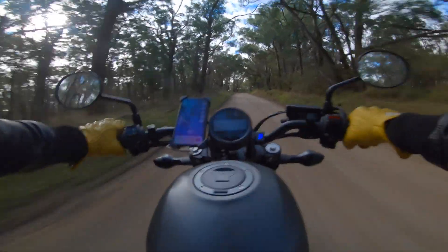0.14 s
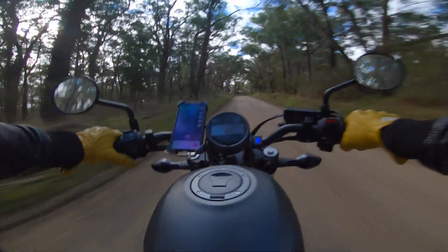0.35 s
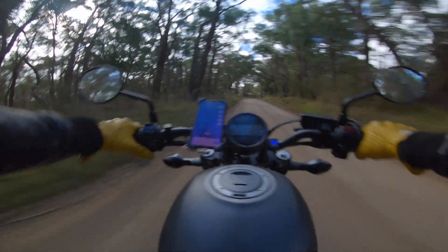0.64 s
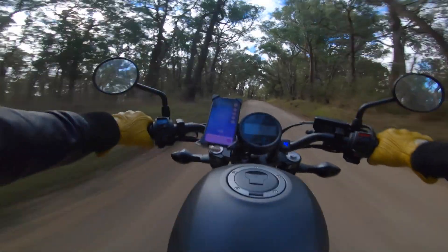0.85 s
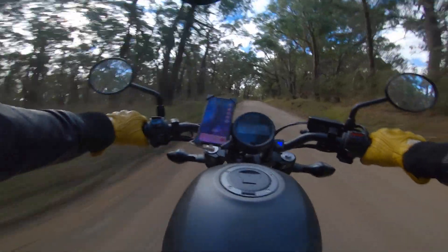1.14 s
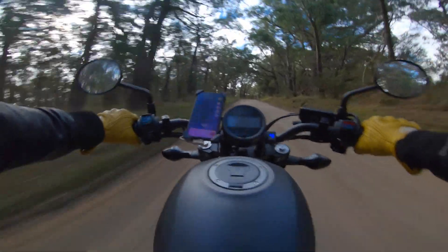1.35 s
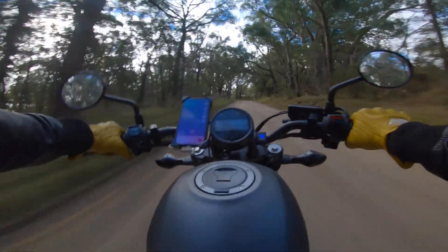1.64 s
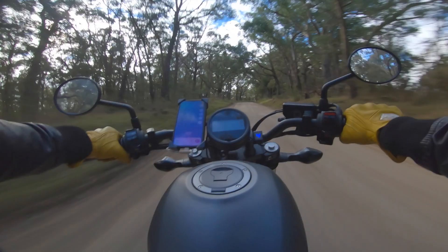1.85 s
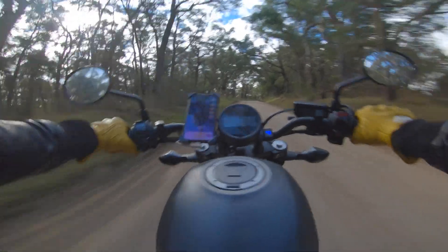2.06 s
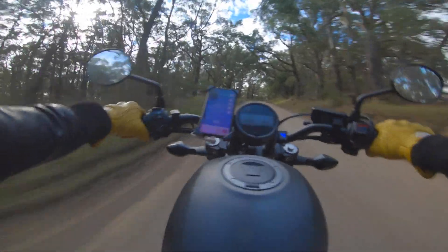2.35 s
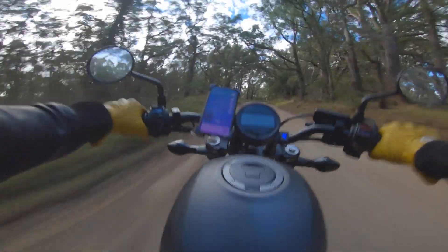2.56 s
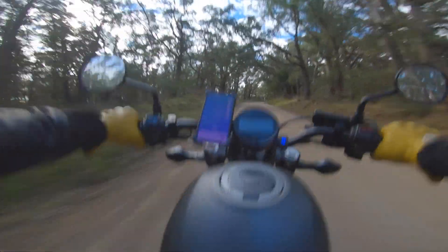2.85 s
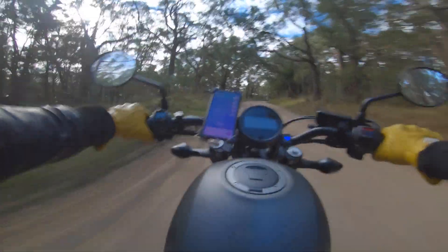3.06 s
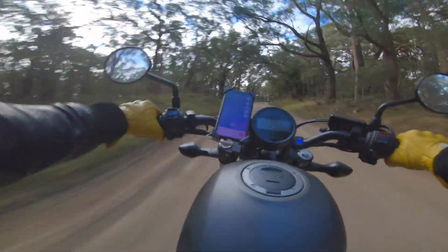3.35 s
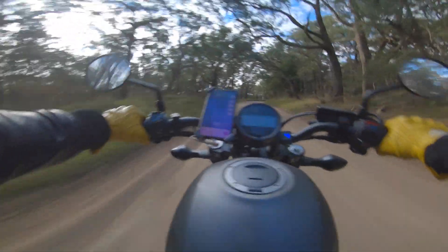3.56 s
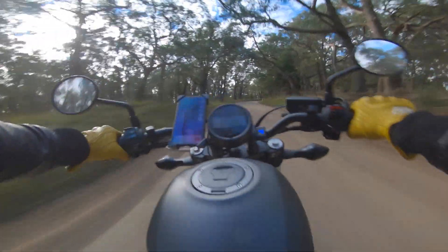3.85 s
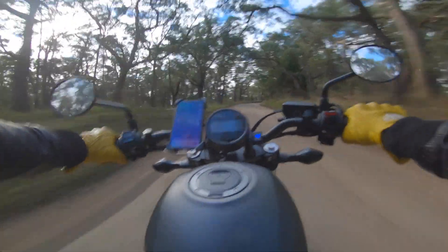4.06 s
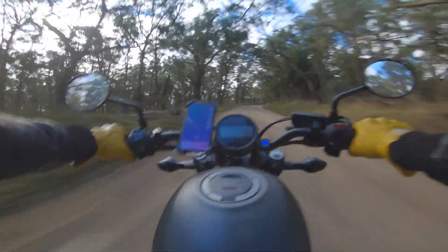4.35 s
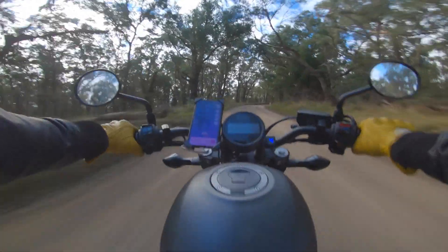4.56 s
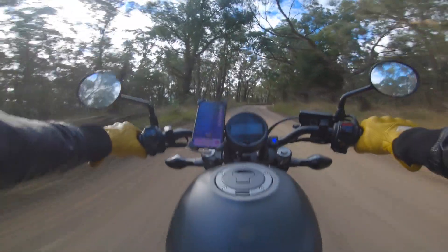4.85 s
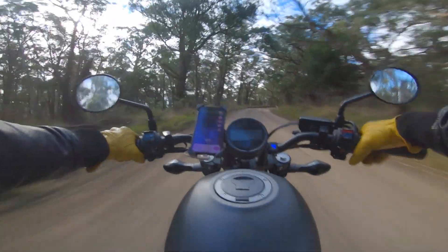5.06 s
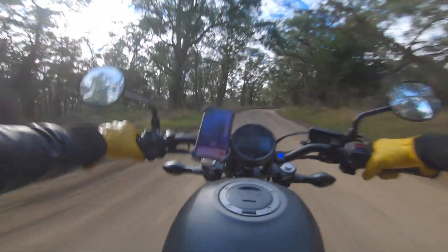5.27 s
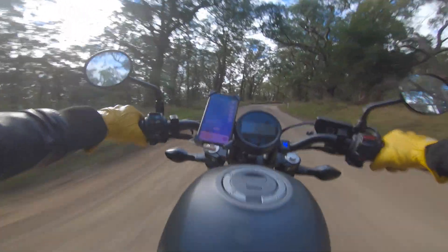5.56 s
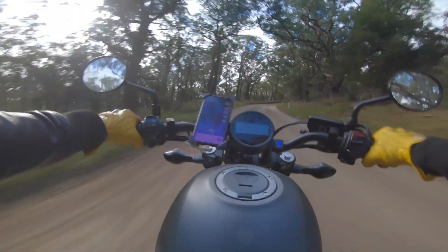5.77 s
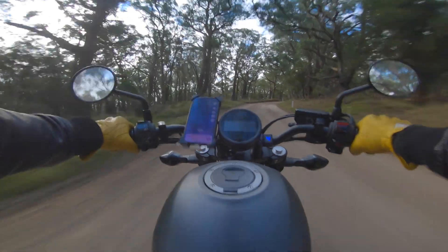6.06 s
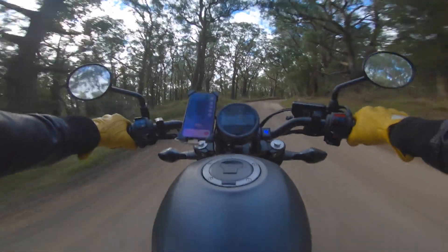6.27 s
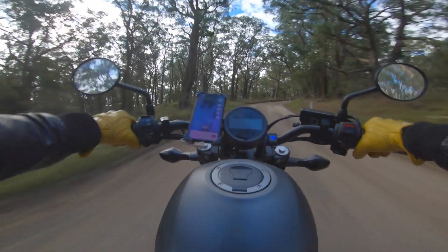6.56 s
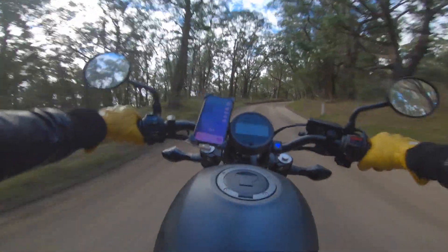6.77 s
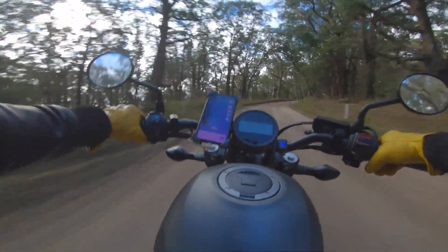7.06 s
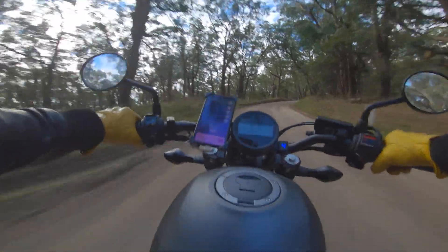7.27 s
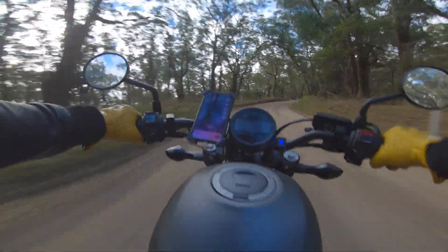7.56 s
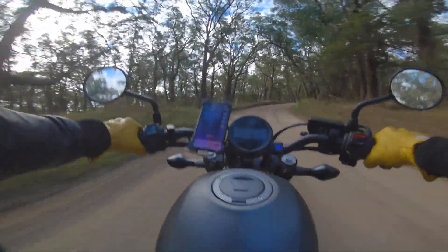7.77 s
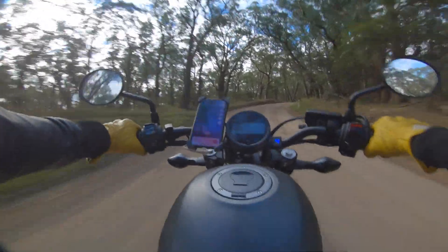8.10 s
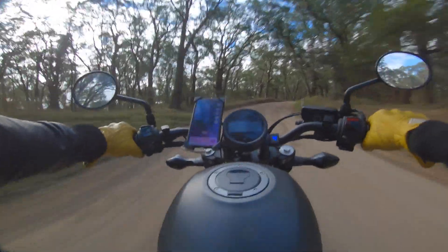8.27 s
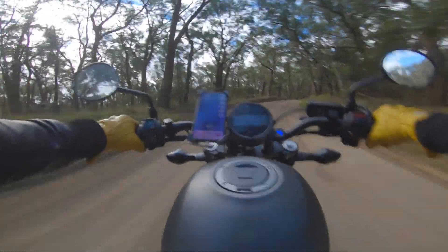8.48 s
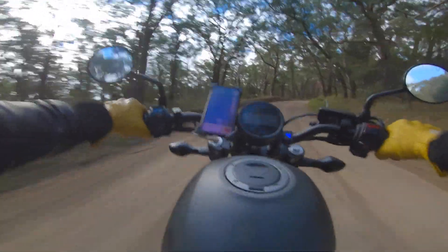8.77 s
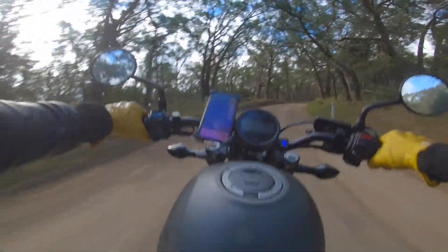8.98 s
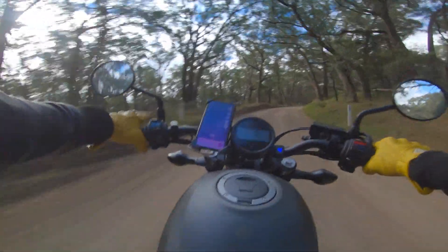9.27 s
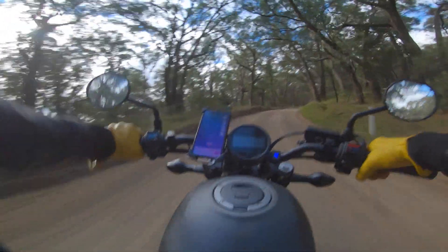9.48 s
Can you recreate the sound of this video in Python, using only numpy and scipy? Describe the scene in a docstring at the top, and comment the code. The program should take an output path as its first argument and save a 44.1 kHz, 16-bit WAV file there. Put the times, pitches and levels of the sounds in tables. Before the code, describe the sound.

Continuous muffled motorcycle drone on an unpaved forest road, with the microphone close against the rider's body. Airy, booming intake pulses rise gradually, soften at several brief throttle roll-offs and end slower and deeper. Mechanical clatter rides on the pulses, and low wind rumbles softly. Tyre grit is very faint. One bright click stands out near the start; heavy low bumps hit just past halfway, followed by a short loose-panel rattle.

```python
"""A twin-cylinder motorcycle throbs along a gravel forest track, muffled as by a microphone on the rider's chest.
Two gulps of air a cycle ring airbox and intake pipe; closing valves add rasp. Roll-offs of the throttle soften them.
Filtered noise makes wind rumble, engine clatter, a buzzing panel and, with stones ringing the bodywork, tyre crunch.
Short pushes through resonances make the knocks; one decaying step makes a sharp click."""
import sys
import numpy as np
from scipy import signal
from scipy.fft import rfft, irfft, next_fast_len
from scipy.io import wavfile
from scipy.ndimage import uniform_filter1d, minimum_filter1d

SR = 44100
rng = np.random.default_rng(int(sys.argv[2]) if len(sys.argv) > 2 else 0)


def store_wav(level_fs):
    """Save 16-bit WAV to argv[1]."""
    pcm = np.round(np.clip(np.atleast_2d(level_fs), -1, 1) * 32767)
    wavfile.write(sys.argv[1], SR, pcm.T.astype(np.int16))


N = 425124
TIME = np.arange(N) / SR
CRUISE_CYCLES_PER_S = 18  # four-stroke cycles
SECOND_LAG_CYCLES = .226  # between the two cylinders' intakes


def from_db(db):
    """Decibels to amplitude gain."""
    return 10 ** (np.asarray(db) / 20)


def rms_one(x):
    """Scale to unit rms."""
    return x / np.sqrt(np.mean(x ** 2) + 1e-20)


def evened(x):
    """Hold the rms near one over a few engine cycles, keeping the throb inside each."""
    power = uniform_filter1d(x ** 2, size=SR // 9)
    power = uniform_filter1d(power, size=SR // 6)
    return x / np.sqrt(np.maximum(power, 1e-20))


def in_time(rows):
    """Interpolate (time, value) rows to one value per sample."""
    s, value = np.transpose(rows)
    return np.interp(TIME, s, value)


def low_pass(x, hz, order=2):
    """Butterworth low-pass."""
    sos = signal.butter(order, min(hz, .45 * SR), fs=SR, output="sos")
    return signal.sosfilt(sos, x + 1e-18)


def drift(rate_hz):
    """Low-passed noise of unit rms, drawn every 40 samples and interpolated."""
    step = np.arange(0, N + SR, 40)
    smooth = signal.butter(2, rate_hz, fs=SR / step[1], output="sos")
    wander = rms_one(signal.sosfilt(smooth, rng.standard_normal(len(step))))
    return np.interp(np.arange(N) + SR, step, wander)  # skip the filter's first second


def resonance(x, hz, width_hz):
    """Two-pole resonance with about unit gain at its peak."""
    r = np.exp(-np.pi * width_hz / SR)
    zeros = np.array([1, 0, -1]) * (1 - r * r) / 2
    poles = [1, -2 * r * np.cos(2 * np.pi * hz / SR), r * r]
    return signal.lfilter(zeros, poles, x + 1e-18)


def coloured(x, spectrum):
    """Shape x by a spectrum that falls away above its last point; unit rms."""
    size = next_fast_len(N)
    hz = np.maximum(np.arange(size // 2 + 1) * SR / size, 1)
    points_hz, db = np.transpose(spectrum)
    gain = from_db(np.interp(np.log(hz), np.log(points_hz), db))
    gain = gain / (1 + (hz / points_hz[-1]) ** 4)
    return rms_one(irfft(rfft(x, size) * gain, size)[:N])


def engine_db(law, cycles_per_s, throttle):
    """The level of an engine sound follows revs and throttle."""
    cruise_db, per_cycle_db, shut_db = law
    return cruise_db + per_cycle_db * (cycles_per_s - CRUISE_CYCLES_PER_S) + shut_db * (1 - throttle)


def valve_shut(turn, at_cycles, width_cycles):
    """A Gaussian bump at one point of each cycle, about an intake valve's closing."""
    offset = (turn - at_cycles + .5) % 1 - .5
    return np.exp(-(offset / width_cycles) ** 2)


def bodywork(blows):
    """Tank, mudguards and fairing ring with damped modes of alternating sign."""
    # modes: f/Hz, level/dB, t60/s
    body_modes = [(380, -5, 0.021), (520, -6.5, .02), (680, -5, 0.041), (874, -1, 0.031),
                  (1155, -0.5, 0.032), (1460, -7.5, 0.047), (1770, -16.5, 0.01)]
    out = np.zeros(N)
    for k, (hz, db, t60_s) in enumerate(body_modes):
        r = from_db(-60 / (t60_s * SR))
        w = 2 * np.pi * hz / SR
        ring = signal.lfilter([0, np.sin(w)], [1, -2 * r * np.cos(w), r * r], blows + 1e-18)
        out += (-1) ** k * from_db(db) * ring
    return out


def hiss():
    """Very faint white noise."""
    return from_db(-100) * rng.standard_normal(N)


def wind(lumpy_db=1.62):
    """Air buffets the rider's jacket: low noise of fluctuating level."""
    # wind spectrum shape: f/Hz, relative level/dB
    wind_spectrum = [(12, -23.5), (22, -7.5), (33, -4), (55, -6), (90, -4.5), (130, -9.5), (180, -14),
                     (250, -25), (350, -35), (600, -51.5)]
    # wind strength: t/s, relative level/dB
    buffeting = [(0, -27.5), (2.3, -30), (3.5, -25.5), (4.2, -33), (5.2, -25), (6.9, -26.5), (7.7, -29.5),
                 (9.2, -33), (9.6, -28)]
    level_db = in_time(buffeting) + 7.0 + lumpy_db * drift(6.7)
    return from_db(level_db) * coloured(rng.standard_normal(N), wind_spectrum)


def tyres(stones_per_s=900, spread_db=4.0, patchy_db=2.5):
    """Grit crunches under the tyres as noise; thrown stones, random impulses, ring the bodywork."""
    # crunch spectrum shape: f/Hz, relative level/dB
    crunch_spectrum = [(400, -12), (650, -0.5), (850, 0), (1150, 0), (1330, -4.5), (1500, -4.5),
                       (1800, -11), (2200, -17.5), (2800, -23.5), (4000, -37)]
    # coarseness of the track: t/s, relative level/dB
    gravel = [(0, -57), (.9, -60.5), (1.45, -56), (2.1, -61.5), (3.1, -61.5), (3.55, -58.8), (4.8, -62.2),
              (5.2, -67), (5.6, -60), (6.3, -58.5), (7.2, -62), (7.45, -57.5), (9.64, -60.5)]
    sizes = from_db(spread_db * np.minimum(rng.exponential(1, N), 4)) * rng.choice([-1, 1], N)
    stones = sizes * (rng.random(N) < stones_per_s / SR)
    grit = coloured(rng.standard_normal(N), crunch_spectrum)
    ringing = coloured(bodywork(stones), crunch_spectrum)
    level_db = in_time(gravel) + patchy_db * drift(59)
    return from_db(level_db) * (from_db(-1.0) * grit + from_db(-4.5) * ringing)


def knocks(crack_share=1.3, thud_share=1.8):
    """Bumps and larger stones crack, thud through the frame and ring the bodywork; softer contact is duller."""
    # pushes from stones and bumps: t/s, relative level/dB, corner f/Hz
    contacts = [(.282, -34.5, 900), (1.18, -37, 1296), (1.343, -33, 700), (1.359, -30, 596),
                (1.41, -29, 450), (4.425, -33.5, 1010), (5.286, -12, 140), (6.012, -34, 500),
                (6.165, -14, 280), (6.186, -28.5, 500), (6.272, -13, 270), (7.388, -38.5, 1200),
                (7.568, -39, 1180), (7.822, -26.5, 1570), (7.908, -33, 1217), (8.851, -37, 1320),
                (9.537, -42, 1022)]
    blows = np.zeros(N)
    age_s = np.arange(SR // 100) / SR
    for s, db, hz in contacts:
        push = age_s * np.exp(-2 * np.pi * hz * age_s)
        at = round(s * SR)
        blows[at:at + len(push)] += from_db(db) * push / push.sum()
    crack = resonance(blows, hz=700, width_hz=1300) * SR / (2 * np.pi * 1200)
    thud = resonance(blows, hz=240, width_hz=70) * SR / (2 * np.pi * 70)
    mix = bodywork(blows) + crack_share * crack + thud_share * low_pass(thud, hz=450)
    return from_db(-3.5) * low_pass(mix, hz=1900, order=4)


def click(at_s=1.7165, level_db=-3, decay_s=.0018):
    """One sharp, dry click: a sudden step with exponential decay."""
    age_s = TIME - at_s
    return from_db(level_db) * (age_s >= 0) * np.exp(-np.abs(age_s) / decay_s)


def panel_buzz(cycles_per_s, flutter_db=4.0):
    """A loose panel chatters on two modes: faintly, more at low revs, and shaken hard once."""
    shake_s, attack_s, shake_db, fade_db_per_s = 7.28, .16, -53.5, 13.5
    rest_db, rest_db_per_cycle = -73, -3.5
    chatter = rng.standard_normal(N) * from_db(flutter_db * drift(30))
    modes = resonance(chatter, hz=913, width_hz=74) + .5 * resonance(chatter, hz=1080, width_hz=64)
    age_s = np.maximum(TIME - shake_s, 0)
    fade_db = fade_db_per_s * np.maximum(age_s - attack_s, 0)
    shaken = np.minimum(age_s / attack_s, 1) * from_db(shake_db - fade_db)
    resting = from_db(rest_db + rest_db_per_cycle * (cycles_per_s - CRUISE_CYCLES_PER_S))
    return np.hypot(shaken, resting) * rms_one(low_pass(modes, hz=1400, order=4))


def clatter(turn, throttle, cycles_per_s, shut_gain=.9):
    """Mechanical rattle: noise that flares each cycle about the valve's closing under load."""
    # rattle spectrum shape: f/Hz, relative level/dB
    rattle_spectrum = [(150, -12), (220, 4), (300, -2.5), (400, -5), (520, -12), (680, -17), (900, -27.5),
                       (1400, -34.5)]
    # level law: loaded cruise level/dB, slope/dB per cycle/s, shut-throttle change/dB
    clatter_law = (-42.5, 0.34, -1.5)
    flare = 1 + shut_gain * throttle * valve_shut(turn, at_cycles=.23, width_cycles=.15)
    rattle = coloured(rng.standard_normal(N), rattle_spectrum) * flare * from_db(1.4 * drift(8.7))
    return from_db(engine_db(clatter_law, cycles_per_s, throttle)) * evened(rattle)


def rasp(turn, throttle, cycles_per_s, second_share=.5):
    """The closing valves ring the upper pipe modes: a hard edge that grows with revs and load."""
    # level law: loaded cruise level/dB, slope/dB per cycle/s, shut-throttle change/dB
    rasp_law = (-45.8, 1.8, -13.0)
    first = valve_shut(turn, at_cycles=.15, width_cycles=.012)
    second = valve_shut(turn - SECOND_LAG_CYCLES, at_cycles=.15, width_cycles=.011)
    snap = -first - second_share * second
    modes = resonance(snap, hz=267, width_hz=45)
    modes = modes - .48 * resonance(snap, hz=383, width_hz=45)
    modes = modes + .28 * resonance(snap, hz=520, width_hz=70)
    return from_db(engine_db(rasp_law, cycles_per_s, throttle)) * evened(low_pass(modes, hz=780, order=4))


def throttle_opening():
    """One under load; each roll-off closes the throttle, holds it and opens it again."""
    # roll-offs: start t/s, time until reopening/s, share shut (0-1)
    roll_offs = [(1.021, 0.22, 0.33), (3.08, 0.3, 0.26), (4.8, .57, 1.0), (6.052, 0.58, 0.35),
                 (6.845, .45, 1), (9.382, .4, 0.7)]
    close_s, reopen_s = .2, .16
    shut = np.zeros(N)
    for s, length_s, share in roll_offs:
        closing = (TIME - s) / close_s
        reopening = 1 - (TIME - s - length_s) / reopen_s
        shut += share * np.clip(np.minimum(closing, reopening), 0, 1)
    return np.clip(1 - shut, 0, 1)


def crank(cycles_per_s, throttle):
    """Cycles turned so far; the crank turns nearly evenly under load and stumbles on a shut throttle."""
    start, wander, stumble = .83, .0018, .012  # cycles
    unsteady = (wander + stumble * (1 - throttle) ** 2) * drift(27)
    return start + np.cumsum(cycles_per_s) / SR + unsteady


def gulps(turn, throttle, open_share=.15, roundness=1.55, coasting_uneven_db=1.0):
    """Air flow past one intake valve: a rounded gulp a cycle, less even in strength on a shut throttle."""
    uneven_db, stretch = .7, .02
    strength, length = rng.standard_normal((256, 2))[turn.astype(int)].T  # one draw per cycle
    lift = np.clip(turn % 1 / (open_share * (1 + stretch * length)), 0, 1)
    flow = np.maximum(np.sin(np.pi * lift), 0) ** roundness
    return flow * from_db(strength * (uneven_db + coasting_uneven_db * (1 - throttle)))


def intake(turn, throttle, cycles_per_s, second_share=.83):
    """Two gulps, about half a crank turn apart: the airbox booms on, the pipe barks briefly near its tuned revs."""
    # boom level law: loaded cruise level/dB, slope/dB per cycle/s, shut-throttle change/dB
    boom_law = (-10.0, .17, -3.5)
    bark_cycles_per_s, bark_db, bark_fall_db_per_cycle, bark_shut_db = 17.63, .27, 3, -6
    flow = gulps(turn, throttle) + second_share * gulps(turn - SECOND_LAG_CYCLES, throttle)
    airbox = resonance(flow, hz=71.9, width_hz=11.64)
    airbox = airbox - .3 * throttle * resonance(flow, hz=104.0, width_hz=7.7)
    pipe = resonance(flow, hz=143, width_hz=100)
    detuned = np.abs(cycles_per_s - bark_cycles_per_s)
    pipe_db = bark_db - bark_fall_db_per_cycle * detuned + bark_shut_db * (1 - throttle)
    boom = evened(from_db(pipe_db) * pipe - airbox)
    return from_db(engine_db(boom_law, cycles_per_s, throttle)) * boom


def scene():
    """Revs and throttle drive the engine over wind and track, all muffled; click and hiss stay bright."""
    # engine speed: t/s, four-stroke cycle rate/(cycles/s)
    speed = [(0.0, 17.664), (0.43, 17.806), (2.2, 19.447), (3.37, 19.977), (4.92, 21.054), (5.11, 19.023),
             (5.37, 19.786), (5.67, 19.003), (6.4, 19.028), (6.88, 18.586), (7.06, 16.898), (7.45, 17.502),
             (7.62, 16.539), (8.22, 16.502), (9.64, 16.107)]
    cycles_per_s = in_time(speed)
    throttle = throttle_opening()
    turn = crank(cycles_per_s, throttle)
    track = tyres() + knocks() + panel_buzz(cycles_per_s)
    engine = clatter(turn, throttle, cycles_per_s)
    engine = engine + rasp(turn, throttle, cycles_per_s)
    engine = engine + intake(turn, throttle, cycles_per_s)
    muffled = low_pass(wind() + track + engine, hz=3640, order=4)
    return (hiss() + click() + muffled)[None]


def record(dry):
    """A look-ahead limiter holds the strongest strokes down, and a steep low-pass cuts the top."""
    limit_db, release_db_per_s, stop_hz = -2.26, 25, 17500
    over_db = np.maximum(20 * np.log10(np.abs(dry[0]) + 1e-9) - limit_db, 0)
    ramp_db = release_db_per_s * TIME
    gain_db = ramp_db - np.maximum.accumulate(over_db + ramp_db)  # instant attack, linear dB release
    gain_db = minimum_filter1d(gain_db, size=SR // 50)  # look ahead
    gain_db = uniform_filter1d(uniform_filter1d(gain_db, size=SR // 100), size=SR // 100)
    top_cut = signal.cheby2(12, 70, stop_hz, fs=SR, output="sos")
    return signal.sosfilt(top_cut, dry * from_db(gain_db))


dry = scene()
out = record(dry)
store_wav(out)
```